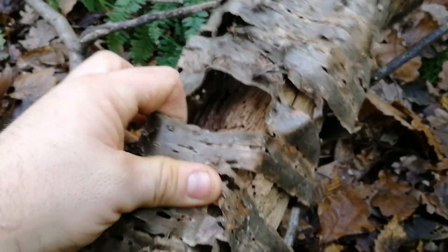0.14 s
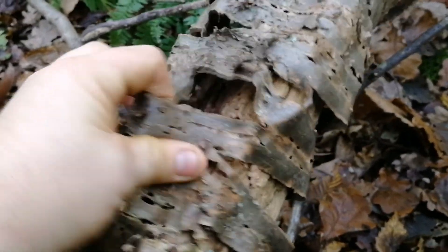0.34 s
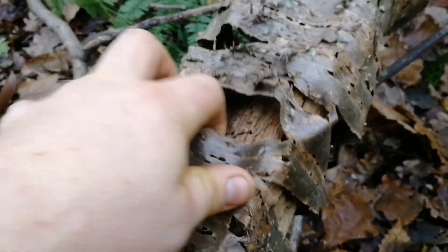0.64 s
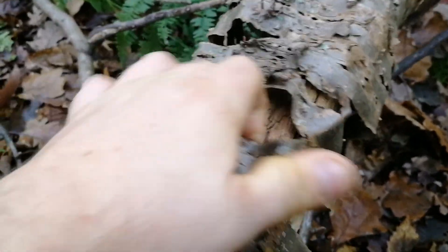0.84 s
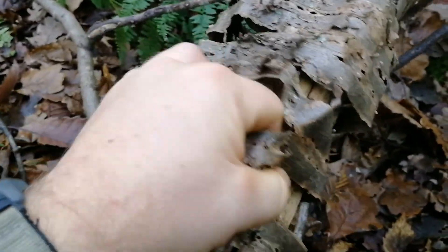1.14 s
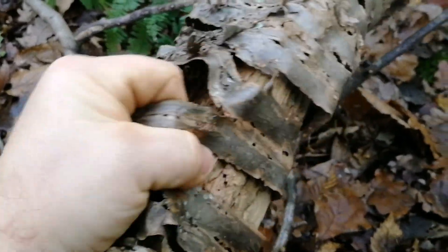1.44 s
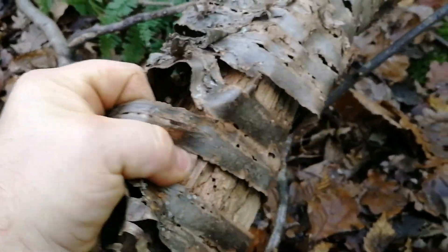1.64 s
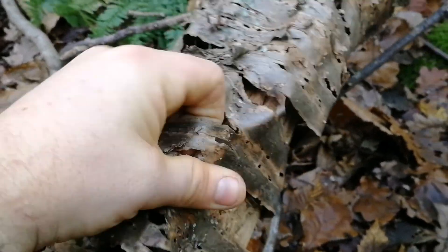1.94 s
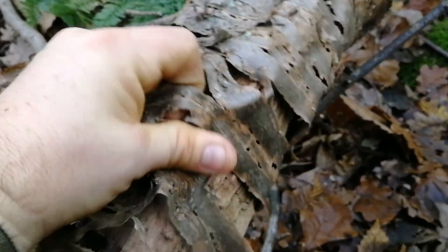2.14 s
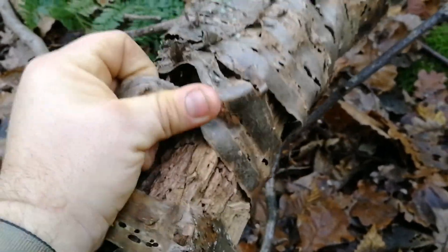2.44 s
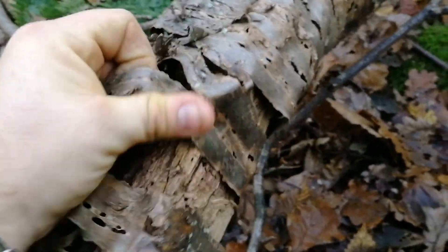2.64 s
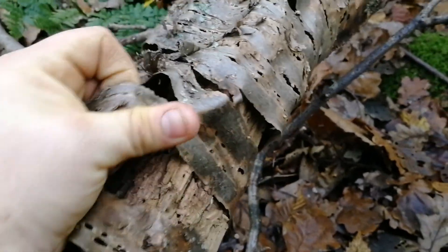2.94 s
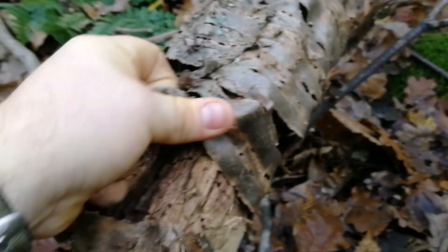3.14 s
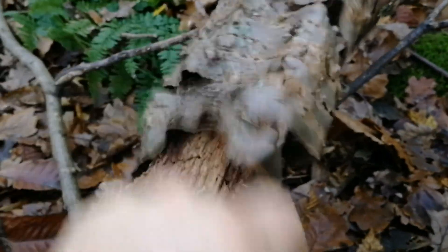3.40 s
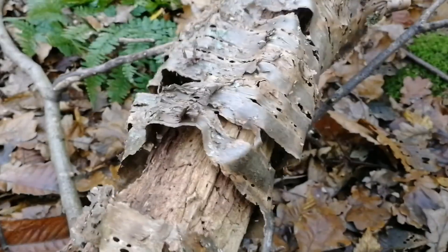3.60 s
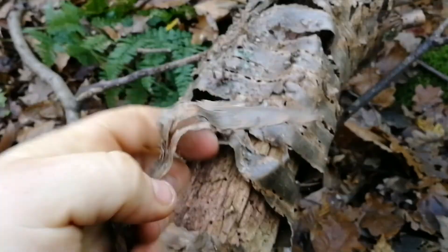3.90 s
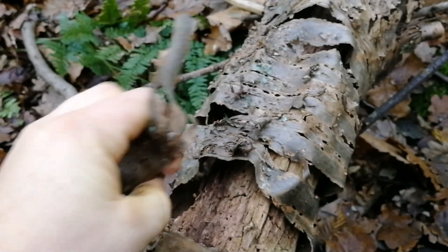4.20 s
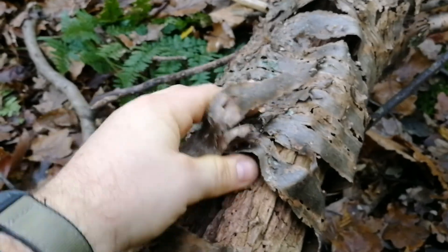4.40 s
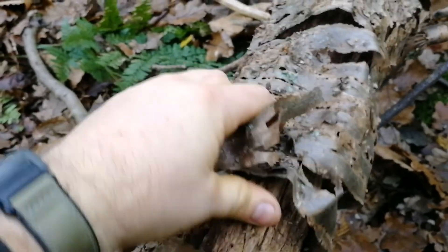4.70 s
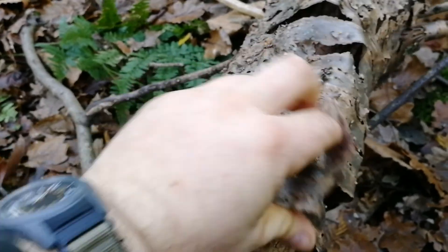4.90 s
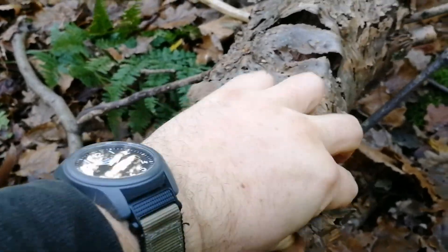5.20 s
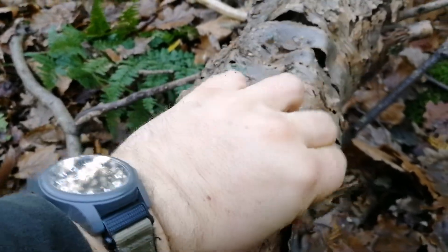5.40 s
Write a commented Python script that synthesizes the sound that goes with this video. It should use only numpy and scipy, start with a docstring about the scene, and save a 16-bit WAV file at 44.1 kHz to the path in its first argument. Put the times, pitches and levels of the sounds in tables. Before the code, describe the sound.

A hand peels dry, papery bark off a rotten log, heard very close in stereo. Sharp snaps come early, then sparse crackling and rustling, stronger cracks past two seconds, and the densest, loudest tearing around three and a half. Later it becomes lighter rubbing with one bright crack near five seconds and a small hollow finger knock. Quiet outdoor air with a faint distant hum.

```python
"""A hand tears dry, papery bark off a rotting log in quiet woodland, heard in stereo from close by.
Short pulls set off a coarse crackle of tiny clicks, sliding fingers a finer, noisier rustle.
Louder single cracks stand out: short bursts of noise shaped by the colour and ring of the broken flake.
Decaying low tones make the dull thuds of the log and one finger knock; a taut strip creaks by stick and slip.
A faint echo, a far-off rumble and a low wavering hum lie around it all."""
import sys
import numpy as np
from scipy import signal
from scipy.fft import rfft, irfft
from scipy.io import wavfile
from scipy.ndimage import uniform_filter1d

SR = 44100
rng = np.random.default_rng(int(sys.argv[2]) if len(sys.argv) > 2 else 0)


def master(y):
    """Save y as 16-bit WAV."""
    cut = np.clip(np.atleast_2d(y).T, -1, 1)
    pcm = np.round(cut * 32767)  # scale
    wavfile.write(sys.argv[1], SR, pcm.astype(np.int16))


N = 244755
TIME = np.arange(N) / SR  # seconds

# shape of the distant rumble's spectrum: (frequency [Hz], relative level [dB per Hz])
RUMBLE_COLOUR = [(15, -24), (40, -1), (70, -1), (130, -10.5), (200, -11), (300, -11), (450, -21.5),
                 (1000, -19.5), (15000, -31.5)]
RUMBLE_DB = -64.5  # before its slow swell
# tones of the hum, before they waver and swell: (frequency [Hz], level [dB])
HUM_TONES = [(65, -73), (97, -75.5), (131, -77)]
# slow swell of the hum; the rumble follows half of it: (time [s], added level [dB])
HUM_SWELL = [(0.8, 5.5), (2.1, 3), (2.7, 7), (3.5, 0.5), (5.5, 0)]

# a finger bumps the hollow shell of bark
KNOCK_S, KNOCK_DB, KNOCK_PAN_DB = 5.3642, -20.5, 9
# ringing modes of that shell: (frequency [Hz], relative level [dB], time to fall by 60 dB [s])
SHELL_MODES = [(840, -10, 0.031), (1050, 5, 0.0096), (2060, -10, .022)]
# tugs that reach the log: (time [s], starting level [dB], starting pitch [Hz], time to fall by 60 dB [s])
LOG_THUDS = [(0.207, -45.5, 293, 0.072), (0.25, -46, 276, 0.083), (0.425, -46, 172, 0.15),
             (1.062, -54, 191, 0.15), (2.2503, -32.5, 174, 0.054), (3.149, -48, 225, 0.16),
             (3.443, -42, 239, 0.09), (3.51, -41.5, 265, 0.075), (3.551, -49.5, 256, 0.24)]
# modes of the log, each detuned a little at random: (multiple of the pitch [ratio], relative level [dB])
LOG_MODES = [(.55, 0), (.8, 3.5), (1, 6.5), (1.3, 2.5), (1.9, -3.5)]
# the strip creaks as it is pulled taut and gives way; both columns are
# centre values for the random jitter and flutter: (time [s], slips per second [Hz], level [dB])
CREAK_PATH = [(3.246, 193.3, -62.5), (3.298, 328, -50), (3.312, 235, -58), (3.338, 146, -65)]

# colour of bark under the cupped hand: (frequency [Hz], gain [dB])
CUPPED_COLOUR = [(600, 1.5), (1000, 10), (1400, 5), (1950, 8), (2900, 1.5), (9000, 1)]
CUPPED_FROM_S = 4.38
# gliding main resonance of the held sheet: (time [s], frequency [Hz])
SHEET_GLIDE = [(0.5, 3080), (0.8, 3530), (1.95, 3030), (4.1, 4070), (4.6, 4970)]

# the hand slides over the bark:
# (start [s], length [s], starting treble level [dB], hollow body against treble [dB])
RUB_STROKES = [(-0.02, 0.023, -50, 11.5), (0.41, 0.19, -51, 9.5), (0.63, 0.045, -43.5, -0.5),
               (0.68, 0.26, -50.5, 5), (0.95, 0.071, -59, 7), (1.72, 0.36, -62, 4), (2.91, 0.077, -46, 0.5),
               (4.02, 0.14, -61.5, -9), (4.1, 0.027, -57, -13), (4.435, 0.05, -42, -4.5),
               (4.572, 0.1, -49.5, 5.5), (4.71, 0.074, -56, 8), (4.855, 0.054, -45.5, 4),
               (5.145, 0.042, -54.5, -0.5), (5.225, 0.055, -50, -1.5), (5.335, 0.078, -54.5, 8),
               (5.478, 0.021, -50, -17)]
RUB_ATTACK_S, RUB_RELEASE_S, RUB_SAG_DB_PER_S = 0.022, 0.019, 5.5
# pulls that tear fibres loose:
# (start [s], length [s], starting treble level [dB], hollow body against treble [dB])
TEAR_STROKES = [(0.185, 0.13, -51.5, 10.5), (0.31, 0.038, -42, -3), (1.055, 0.085, -48.5, 8),
                (1.27, 0.066, -49.5, -3), (1.355, 0.081, -48, 5), (1.55, 0.11, -53, -22),
                (1.645, 0.055, -48.5, 0), (1.875, 0.12, -43.5, -3.5), (2.085, 0.1, -47, -6),
                (2.235, 0.1, -45.5, 7.5), (2.42, 0.031, -42.5, 2.5), (2.5, 0.044, -60.5, -16),
                (2.69, 0.11, -49, 2), (3.09, 0.18, -43, 8), (3.255, 0.069, -41, 11.5),
                (3.435, 0.039, -44.5, 6.5), (3.535, 0.095, -37, 4.5), (3.71, 0.043, -42.5, 3.5),
                (3.785, 0.055, -47.5, 12), (3.892, 0.055, -43, 6.5), (4.96, 0.013, -48, -1.5)]
# a pull bites quickly and slackens as the bark gives
TEAR_ATTACK_S, TEAR_RELEASE_S, TEAR_SAG_DB_PER_S = 0.012, 0.014, 10
# the fingers never lie quite still on the bark, but their touch lightens for a moment
CONTACT_DB, CONTACT_HOLLOW_DB = -62.5, 6.5
LIGHTER_FROM_S, LIGHTER_TO_S, LIGHTER_DB = 4.2, 4.32, -10.5
# loosened crumbs go on ticking after every stroke
SETTLE_S, SETTLE_DB = 0.058, -10

BODY_HZ, SHEET_HZ, TREBLE_HZ = 880, 2700, 4370  # hollow body, flexing sheet, lower edge of the treble
# shape of the breaking bark's spectrum at each microphone port: (frequency [Hz], relative level [dB per Hz])
LEFT_COLOUR = [(100, -39.5), (260, -25), (440, -27), (720, -13.5), (960, -10), (1250, -15.5), (2000, -6.5),
               (3300, -11), (4600, -4.5), (6400, -3), (7900, 4), (9800, -6.5), (13000, -17), (15500, -27)]
RIGHT_COLOUR = [(100, -40.5), (260, -30.5), (440, -33.5), (660, -34), (900, -28), (1100, -26.5),
                (1550, -18.5), (2600, -18), (3150, -13.5), (3700, -12), (5400, -13.5), (8000, -15),
                (12000, -29), (15500, -32.5)]
# single fractures: (time [s], treble level over 5 ms [dB], hollow body near 900 Hz [dB],
# flexing sheet near 2.7 kHz [dB], ring of the broken flake [Hz], shift to the left [dB])
SINGLE_CRACKS = [(0.1989, -26.5, 11, 14, 5300, -0.5), (0.2082, -17.5, -1.5, -1, 7800, 5.5),
                 (0.2508, -18, 1, 2.5, 8600, 3), (0.2606, -19, -9, 1, 8200, 2),
                 (0.332, -34.5, -7, 6, 9700, 0), (0.3613, -34.5, -5, -3, 11100, -1),
                 (0.3975, -34.5, -4, 8, 2700, 0), (0.425, -24.5, 5.5, 1.5, 2900, 2.5),
                 (0.6064, -44.5, -14, 13, 3220, -0.5), (0.6859, -41.5, 6, 1, 5130, 1),
                 (0.763, -42, -5, 6, 3300, -2), (0.7805, -41, -5.5, 7, 3460, -5.5),
                 (0.8669, -29, -9.5, 4.5, 7070, -1), (1.061, -34.5, 15.5, -3, 2000, -0.5),
                 (1.1088, -26.5, -13, -3.5, 8800, 0), (1.2648, -35.5, -30, -2, 9100, 1),
                 (1.3175, -39.5, -9, 15, 8400, 4), (1.3597, -25, 10, 12, 6100, 0.5),
                 (1.5054, -24, -21, 2.5, 7960, 5), (1.5479, -36.5, -14, 13, 5700, 1.5),
                 (1.6112, -42, -30, -6, 9600, 13), (1.668, -32, 1, 16.5, 6040, -3),
                 (1.6802, -43.5, 7, 10, 4450, -2), (1.8838, -29.5, -29, -12, 9100, 11),
                 (2.114, -27.5, 4.5, 11.5, 2440, -2), (2.1492, -45, 21, 0.5, 1820, 0),
                 (2.1661, -27, -7, -2, 8060, 2), (2.1785, -26, -10, -7, 7400, 13),
                 (2.2263, -15, -4.5, -2, 3170, -0.5), (2.251, -17.5, -1, -9, 9100, 3),
                 (2.3482, -20, -8.5, 5, 4940, -3), (2.4218, -30, -24, -4, 8000, 1),
                 (2.4371, -21, -5.5, -6, 8170, 2), (2.4440, -22, 5, 5, 5500, 3.5),
                 (3.054, -35, 8, 12, 7000, 3.5), (3.076, -33, 0, 3, 7960, 3),
                 (3.124, -25.5, 3.5, 11.5, 5640, 6), (3.1483, -20.5, -0.5, 7.5, 3370, -0.5),
                 (3.152, -25.5, 0, -18, 7400, 1), (3.1725, -38, 11.5, 17, 4580, 1),
                 (3.2521, -34, 11, 14, 4370, 1), (3.2772, -25, -3.5, 3.5, 8300, 4.5),
                 (3.2923, -31.5, 16, 19, 3510, -6.5), (3.308, -27, -10, 2, 6700, 1),
                 (3.3168, -40, 11, -5, 8000, 5), (3.3377, -32.5, 0, 11, 7740, 3),
                 (3.3504, -32.5, 1.5, 7, 7900, -1), (3.4053, -22, 5.5, 12.5, 2450, -1.5),
                 (3.4436, -37.5, 17.5, 9, 2600, 2), (3.4524, -36, 6, 15, 3900, -6),
                 (3.4992, -31.5, 13, 15, 4860, -8), (3.51, -13, -3.5, 8, 6140, 8),
                 (3.517, -22, -5.5, -16, 6600, -11), (3.5504, -20.5, -3, 0, 6600, -4),
                 (3.6056, -31, 4, -18, 8600, 10), (3.6441, -24, -3.5, -1, 7400, 6),
                 (3.714, -38, 10, 10.5, 3150, -0.5), (3.742, -35.5, -12, 3, 10300, 12),
                 (3.7885, -33, -16, -1, 9500, 5), (3.8966, -35.5, 11, 5, 3130, -3.5),
                 (3.9454, -33, 4.5, 8, 4360, -2), (3.9911, -27, -6.5, 0, 6660, -6),
                 (4.1997, -42.5, -22, -14, 8350, 17), (4.2132, -47.5, -15, 5.5, 4300, -1),
                 (4.4521, -39.5, -3.5, -14, 7240, 17), (4.524, -37.5, -12, -6, 7420, 6),
                 (4.6483, -31, -9.5, -17, 5030, 0.5), (4.6552, -30, -6, 2, 8200, 4),
                 (4.706, -53, 5, 16, 4500, -1), (4.8838, -37.5, -14, -5, 6600, 14),
                 (4.918, -31.5, -9, -8, 7400, 2.5), (5.0313, -39.5, -4, -3.5, 2200, 1),
                 (5.0417, -18.5, -6, -8.5, 7800, 2.5), (5.43, -40.5, 7.5, 11.5, 3035, -5.5)]

EDGE_HZ = 16300  # upper limit of the recorder


def gain_of(db):
    """Turns decibels into an amplitude."""
    return 10 ** (np.asarray(db) / 20)


def evened(x):
    """Scales a sound to an rms (average strength) of 1."""
    return x / np.sqrt(np.mean(x ** 2) + 1e-20)


def read(points, hz):
    """Reads a curve between its points, along a log-frequency axis."""
    f, value = np.transpose(points)
    return np.interp(np.log(hz + 1), np.log(f + 1), value)


def add(mix, s, sound):
    """Adds a stereo sound to the mix at time s."""
    part = mix[:, max(round(s * SR), 0):][:, :sound.shape[1]]
    part += sound[:, :part.shape[1]]


def drift(rate_hz):
    """Random wander of rms 1: noise with everything much faster than rate_hz smoothed away."""
    hz = np.fft.rfftfreq(N, 1 / SR)
    return evened(irfft(rfft(rng.standard_normal(N)) * np.exp(-(hz / rate_hz) ** 2), N))


def partly_same(first, second, same):
    """Mixes two noises so that the result resembles the first by the share same (0-1)."""
    same = np.clip(same, 0, 1)
    return same * first + np.sqrt(1 - same ** 2) * second


def causal(db):
    """A filter with these gains that rings only after its cause (minimum phase)."""
    both_sides = np.concatenate([db, db[..., -2:0:-1]], -1)
    log_gain = np.log(gain_of(both_sides))
    return np.exp(np.conj(signal.hilbert(log_gain)))[..., :db.shape[-1]]


def air(waver_hz=2.01, waver_db=3.5):
    """Far-off rumble, alike in both ears in the bass, with a wavering hum as of a distant engine."""
    hz, z = np.fft.rfftfreq(N, 1 / SR), rfft(rng.standard_normal((2, N)))
    z[1] = partly_same(z[0], z[1], read([(100, 0.99), (300, 0.72), (1200, 0.051)], hz))
    rumble = gain_of(RUMBLE_DB) * evened(irfft(z * gain_of(read(RUMBLE_COLOUR, hz)), N))
    clock = np.cumsum(1 + 0.042 * drift(waver_hz)) / SR  # uneven time makes the pitch waver
    hum = np.zeros(N)
    for f, db in HUM_TONES:
        tone = evened(np.sin(2 * np.pi * (f * clock + rng.random())))
        hum += gain_of(db + waver_db * drift(7.0)) * tone
    swell_db = np.interp(TIME, *np.transpose(HUM_SWELL))
    return rumble * gain_of(swell_db / 2) + hum * gain_of(swell_db)


def woodland(x, level_db=-27):
    """Ground and trunks scatter a faint, short echo: many random, fading repeats."""
    t, t60 = np.arange(SR // 2) / SR, .28
    hits = rng.random((2, len(t))) < 2500 / SR  # about 2500 echoes a second
    taps = rng.standard_normal((2, len(t))) * hits * (t > .006) * gain_of(-60 * t / t60)
    echo = signal.fftconvolve(x, taps / np.linalg.norm(taps[0]), axes=1)[:, :N]
    return gain_of(level_db) * echo


def knock(rise_s=.001):
    """A soft fingertip on the hollow shell: a few cycles of a woody note, with no crack."""
    out, t = np.zeros((2, N)), np.arange(SR // 10) / SR
    ring = sum(gain_of(db - 60 * t / t60) * np.sin(2 * np.pi * hz * t) for hz, db, t60 in SHELL_MODES)
    left_right = gain_of([[KNOCK_DB], [KNOCK_DB - KNOCK_PAN_DB]])
    add(out, KNOCK_S, left_right * ring * (1 - np.exp(-t / rise_s)))
    return out


def thuds(rise_s=0.0024, sag_per_s=4):
    """Bark on rotten wood rings low and briefly; its pitch sags as the tug slackens."""
    out, t = np.zeros((2, N)), np.arange(SR // 4) / SR
    for s, db, hz, t60 in LOG_THUDS:
        turns = np.cumsum(hz * np.exp(-sag_per_s * t)) / SR
        ring = np.zeros(len(t))
        for multiple, mode_db in LOG_MODES:
            mode_turns = multiple * rng.uniform(0.903, 1.048) * turns + rng.random()
            ring += gain_of(mode_db) * np.sin(2 * np.pi * mode_turns)
        thud = evened(ring) * gain_of(db - 60 * t / t60) * (1 - np.exp(-t / rise_s))
        add(out, s, np.tile(thud, (2, 1)))
    return out


def creak(jitter=0.038, fall_db=4.5, flutter_db=5.5, count=4):
    """Uneven stick and slip of the taut strip: a rough tone with a few overtones."""
    s, hz, db = np.transpose(CREAK_PATH)
    turns = np.cumsum(np.interp(TIME, s, hz) * (1 + jitter * drift(204))) / SR
    tone = sum(gain_of(-fall_db * k) * np.sin(2 * np.pi * (k + 1) * turns) for k in range(count))
    level = gain_of(np.interp(TIME, s, db) + flutter_db * drift(120))
    return evened(tone) * level * (TIME > s[0]) * (TIME < s[-1])


def cupped_hand(x, closing_s=0.27):
    """Late on the hand closes over the bark, and the small hollow it forms colours the sound."""
    cover = np.clip((TIME - CUPPED_FROM_S) / closing_s, 0, 1)
    hollow = irfft(causal(read(CUPPED_COLOUR, np.fft.rfftfreq(1024, 1 / SR))))
    return (1 - cover) * x + cover * signal.oaconvolve(x, hollow[None], axes=1)[:, :N]


def shifting_grip(x, peak_db=5, width_hz=380):
    """The held sheet's main resonance glides, and lesser ones come and go, as the fingers shift on it."""
    hz, t, z = signal.stft(x, SR, nperseg=512)
    patches = uniform_filter1d(rng.standard_normal(z.shape[1:]), size=8, axis=0)
    patches = uniform_filter1d(patches, size=16, axis=1)
    off_centre = (hz[:, None] - np.interp(t, *np.transpose(SHEET_GLIDE))) / width_hz
    ring_db = peak_db / (1 + off_centre ** 2)
    return signal.istft(z * gain_of(ring_db + 2 * evened(patches)), nperseg=512)[1][:, :N]


def stroke_power(rows, attack_s, release_s, sag_db_per_s):
    """Power in treble and hollow body: each stroke swells, sags while it is held, and dies away."""
    power = np.zeros((2, N))
    for start, length, db, hollow_db in rows:
        t = np.maximum(TIME - start, 0)
        shape = np.minimum(t / attack_s, 1) * np.exp(-np.maximum(t - length, 0) / release_s)
        level = gain_of(db - sag_db_per_s * np.minimum(t, length))
        power += (shape * level * gain_of([[0], [hollow_db]])) ** 2
    return power


def handling():
    """What the hand is doing: (treble level [dB], hollow body [dB], share of rubbing [0-1]) over time."""
    tear = stroke_power(TEAR_STROKES, TEAR_ATTACK_S, TEAR_RELEASE_S, TEAR_SAG_DB_PER_S)
    rub = stroke_power(RUB_STROKES, RUB_ATTACK_S, RUB_RELEASE_S, RUB_SAG_DB_PER_S)
    keep = np.exp(-1 / (SETTLE_S * SR))
    settling = gain_of(SETTLE_DB) ** 2 * signal.lfilter([1 - keep], [1, -keep], tear + rub)
    lighter = (TIME > LIGHTER_FROM_S) & (TIME < LIGHTER_TO_S)
    contact = (gain_of(CONTACT_DB + LIGHTER_DB * lighter) * gain_of([[0], [CONTACT_HOLLOW_DB]])) ** 2
    treble, body = tear + rub + settling + contact
    rubbing = (rub[0] + contact[0] / 2) / treble
    return 10 * np.log10(treble), 10 * np.log10(body / treble), rubbing


def shares(hz):
    """How much each frequency belongs to the hollow body, the flexing sheet and the snapping fibres."""
    body = read([(BODY_HZ * 1.58, 1), (SHEET_HZ * 0.91, 0)], hz)
    fibres = read([(SHEET_HZ * 0.79, 0), (TREBLE_HZ * 1.9, 1)], hz)
    return body, 1 - body - fibres, fibres


def flake_colour(hz, body_db, sheet_db, ring_hz, peak_db=9, sharpness=9):
    """Gains in dB at the two ports: the bark's broad colour, drawn toward the flake's own ring."""
    db = np.array([read(LEFT_COLOUR, hz), read(RIGHT_COLOUR, hz)])
    peak = peak_db / (1 + (sharpness * (hz / ring_hz - 1)) ** 2)
    power, out = gain_of(2 * db).sum(0), db + peak
    for share, band_db in zip(shares(hz), (body_db, sheet_db, 0)):
        # the peak moves energy within a band without adding to it
        peak_power = np.average(gain_of(2 * peak), weights=share * power)
        out = out + share * (band_db - 10 * np.log10(peak_power))
    return out


def snap(body_db, sheet_db, ring_hz, pan_db, break_s=0.00024, ring_s=0.0014, ring_db=-14,
         ring_per_body=0.78, hollow_s=0.0033, hollow_db=-18, same=0.6, lag_s=0.0002022, left_db=4, size=2048):
    """One fracture: a burst of breaking fibres, then brief ringing, stronger where the body takes part."""
    t, hz = np.arange(size) / SR, np.fft.rfftfreq(size, 1 / SR)
    noise = rng.standard_normal((3, 2, size))
    noise[:, 1] = partly_same(noise[:, 0], noise[:, 1], same)
    low_pass = signal.butter(2, 2 * BODY_HZ, fs=SR, output="sos")
    hollow = evened(signal.sosfilt(low_pass, noise[2]))
    ringing = noise[1] * gain_of(ring_db) * np.exp(-t / ring_s)
    ringing = ringing + hollow * gain_of(hollow_db) * np.exp(-t / hollow_s)  # low modes last longer
    burst = noise[0] * np.exp(-t / break_s) + ringing * gain_of(ring_per_body * min(body_db, 5))
    z = rfft(burst * (1 - np.exp(-t / 0.00043)))
    # narrow modes stay random, the broad colour is the bark's
    z /= np.sqrt(uniform_filter1d(abs(z) ** 2, size=101, axis=1))
    z *= causal(flake_colour(hz, body_db, sheet_db, ring_hz))
    # the right port hears the sound later by a random lag
    z[1] *= np.exp(-2j * np.pi * hz * lag_s * rng.uniform(0, 2.022))
    z *= gain_of([[pan_db + left_db], [0]]) / np.linalg.norm(z * (hz > 1500), axis=1, keepdims=True)
    treble = np.sum(irfft(z * (hz > TREBLE_HZ)) ** 2) / 2 / (.005 * SR)  # mean power over 5 ms
    fade = np.minimum(2 - 2 * t / t[-1], 1) ** 2
    return irfft(z) * fade / np.sqrt(treble)


def crackle(per_s=800, clumping=0.65, colour_db=4, rub_db=-20, slide_db=16,
            sheet_follows=0.47, sheet_db=-1.5, body_db=-3, count=48):
    """Tiny fractures in clumps, crowding as the strokes grow; dense and fine while the hand rubs."""
    spread_db, pan_db, finer, crowding = 5.4, 3, 3.5, .7
    stroke_db, hollow_db, rubbing = handling()
    # per_s is the base rate of clicks; rubbing, strength and random clumps all change it
    rate = per_s * finer ** rubbing * gain_of(crowding * (stroke_db - np.median(stroke_db)))
    rate = rate * np.exp(clumping * (1 - rubbing / 2) * drift(38))
    size_db = (spread_db - rubbing / 2) * np.minimum(rng.exponential(1, N), 4.5)
    clicks = evened((rng.random(N) < rate / SR) * gain_of(size_db)) * rng.choice([-1, 1], N)
    clicks = clicks + gain_of(rub_db + slide_db * rubbing) * rng.standard_normal(N)
    # level out the slow loudness here; the strokes set it at the end
    clicks /= np.sqrt(signal.fftconvolve(clicks ** 2, np.hanning(4001), "same"))
    flake, out = rng.integers(0, count, N), np.zeros((2, N))
    for k, ring_hz in enumerate(np.geomspace(1400, 10000, count)):  # each flake has its ring, colour, place
        a, b, c = rng.standard_normal(3)
        tick = snap(colour_db * a + body_db, colour_db * b + sheet_db, ring_hz, pan_db * c)
        out += signal.oaconvolve((clicks * (flake == k))[None], tick, axes=1)[:, :N]
    hz, z = np.fft.rfftfreq(N, 1 / SR), rfft(shifting_grip(out))
    z /= irfft(z * (hz > TREBLE_HZ), N).std()
    band_levels = (hollow_db, sheet_follows * hollow_db, 0)
    bands = sum(irfft(z * share, N) * gain_of(db) for share, db in zip(shares(hz), band_levels))
    return gain_of(stroke_db) * bands


def cracks(faint_s=0.0045, faint_db=-27, rebound_s=.0035, rebound_db=-14, rebound_body_db=3, rebound_per_body=0.18):
    """Loud fractures: a very faint tick, then the flake breaks and springs back with a duller tick."""
    out = np.zeros((2, N))
    for s, db, body_db, sheet_db, ring_hz, pan_db in SINGLE_CRACKS:
        early, late = rng.uniform(.5, 1.5, 2)
        faint_tick = snap(body_db, sheet_db, ring_hz, pan_db)
        add(out, s - faint_s * early, gain_of(db + faint_db) * faint_tick)
        add(out, s, gain_of(db) * snap(body_db, sheet_db, ring_hz, pan_db))
        back_db = db + rebound_db + rebound_per_body * min(body_db, 0)
        rebound = snap(body_db + rebound_body_db, sheet_db, ring_hz, pan_db / 2)
        add(out, s + rebound_s * late, gain_of(back_db) * rebound)
    return out


def scene():
    """Bark and log in the open air."""
    bark = cupped_hand(cracks() + crackle()) + knock() + thuds() + creak()
    return bark + woodland(bark) + air()


def record(dry):
    """The recorder rounds off the very highest peaks, then cuts what lies above its band limit."""
    held = dry / (1 + (dry / .86) ** 8) ** (1 / 8)
    low_pass = signal.firwin(255, EDGE_HZ, window=("kaiser", 9), fs=SR)
    return signal.oaconvolve(held, low_pass[None], "same")


dry = scene()
out = record(dry)
master(out)
```